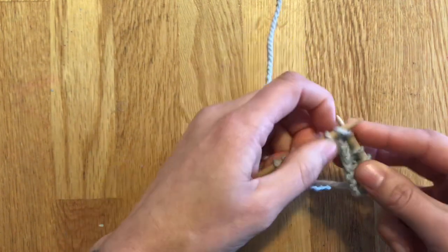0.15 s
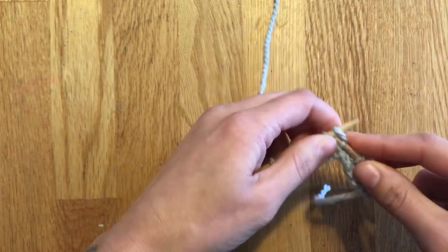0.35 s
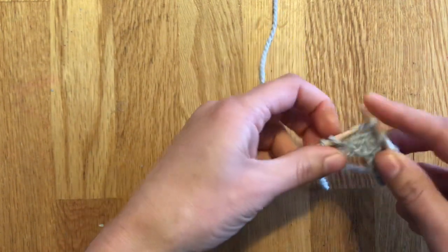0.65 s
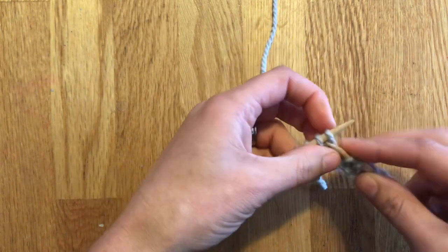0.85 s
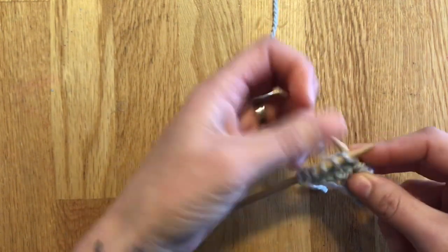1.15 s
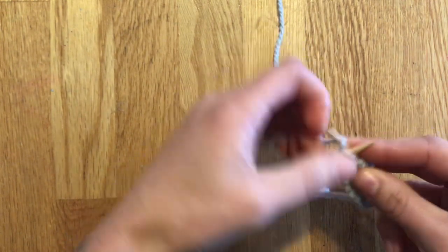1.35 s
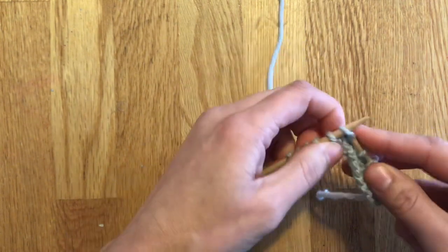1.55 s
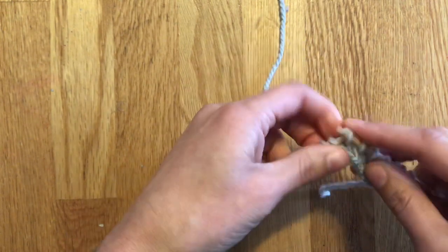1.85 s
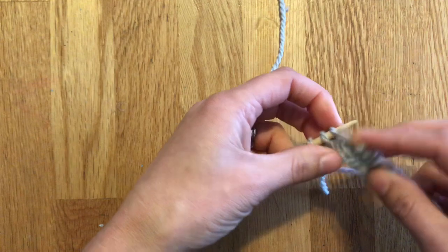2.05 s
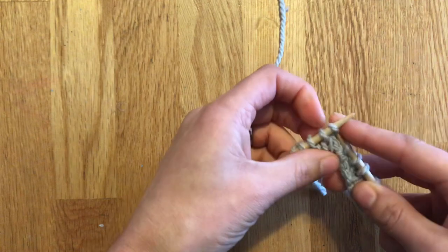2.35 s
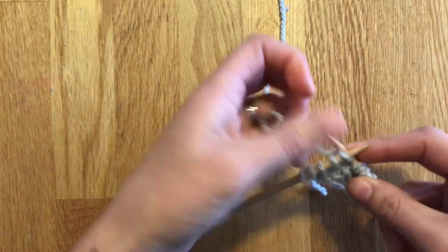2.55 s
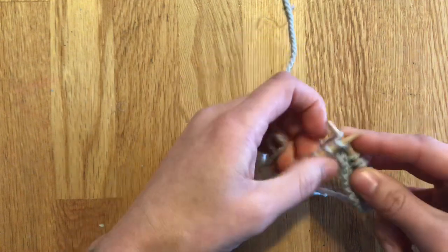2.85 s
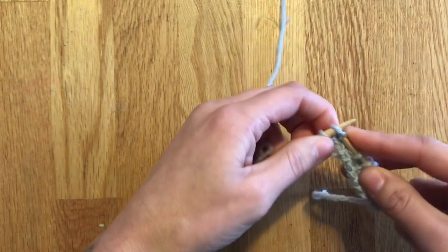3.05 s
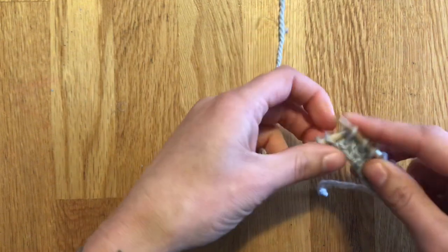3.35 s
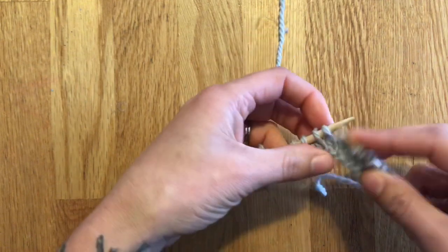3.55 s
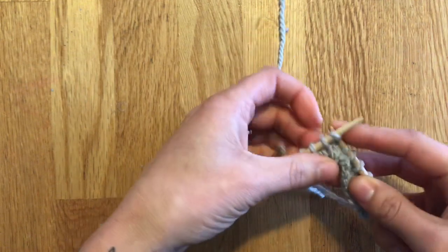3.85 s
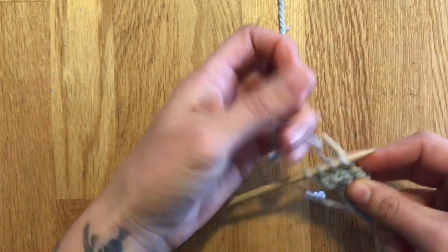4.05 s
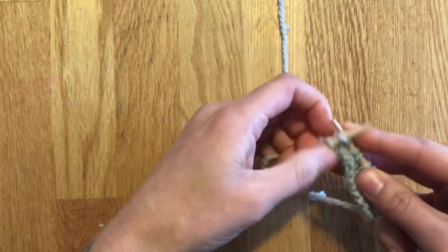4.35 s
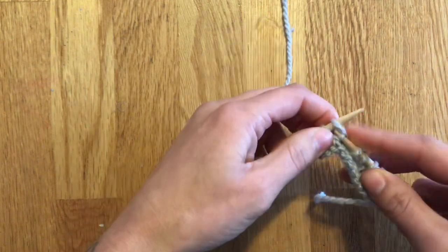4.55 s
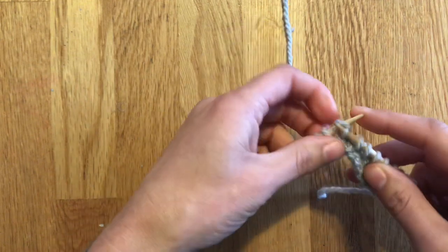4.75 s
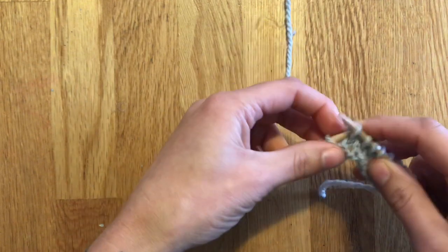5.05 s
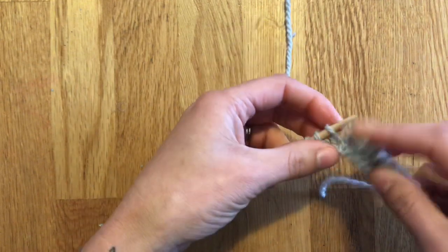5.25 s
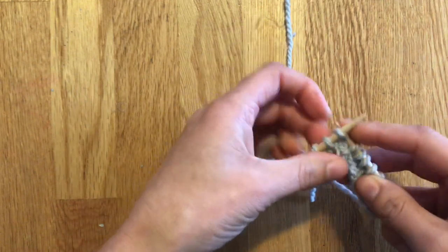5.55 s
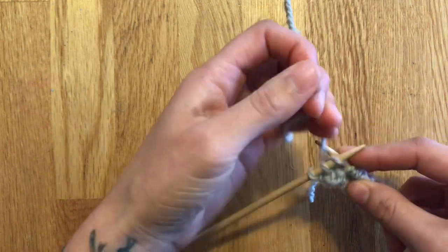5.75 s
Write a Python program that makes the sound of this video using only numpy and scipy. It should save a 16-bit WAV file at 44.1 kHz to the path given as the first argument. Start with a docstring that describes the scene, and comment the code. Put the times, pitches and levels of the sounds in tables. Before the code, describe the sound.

Soft, uneven ticks and tiny scrapes of wooden knitting needles working wool, with a low room drone behind them.

```python
"""Two wooden knitting needles work stitches just above a table, close to the microphone.
Their tips click together and set the shafts ringing; wood sticks and slips on wood in short scrapes.
Wool brushes over needles and fingers, and once a needle's free end knocks the table and skids.
Behind them the quiet room hums, with a low wavering drone as of far machinery."""
import sys
import numpy as np
from scipy import signal
from scipy.fft import rfft, irfft, next_fast_len
from scipy.io import wavfile
from scipy.ndimage import uniform_filter1d, map_coordinates

SR = 44100
rng = np.random.default_rng(int(sys.argv[2]) if len(sys.argv) > 2 else 0)


def unload_wav(signal):
    """Save mono or channel-first audio to the path in sys.argv[1] as 16-bit WAV at rate SR, clipped to [-1, 1]."""
    wavfile.write(
        sys.argv[1],
        SR,
        np.round(np.clip(np.atleast_2d(signal).T, -1, 1) * 32767).astype(np.int16),
    )


N = 260807

# Room tone, well behind the needles. Each row: time in seconds, level in dB.
HUM_LEVELS = [(0, -58), (3.4, -56), (5.91, -52)]
DRONE_LEVELS = [(0, -56.5), (.42, -51.5), (.6, -59.5), (1.35, -50.5), (2, -56.5), (3.25, -55.5), (3.6, -51),
                (3.7, -48.5), (4.4, -47), (4.63, -51.5), (4.95, -43.5), (5.15, -47), (5.91, -45.5)]  # the far machine
WHIRR_LEVELS = [(1.2, -75.5), (2.25, -52), (2.6, -64), (2.9, -58.5), (3.7, -81)]  # a second, passing drone
RUMBLE_LEVELS = [(0, -53), (.45, -53), (.65, -58), (.9, -54), (1.7, -55.5), (2.35, -51.5), (2.6, -59),
                 (2.88, -50.5), (3.4, -54), (5.91, -54.5)]
# Colours of the noises. Each row: frequency in Hz, relative spectral density in dB.
THROB_SPECTRUM = [(30, -60), (60, -24), (75, -12.5), (90, 0), (105, -6), (150, -6.5), (200, -22),
                  (500, -120)]  # the rumble that comes with the drone
RUMBLE_SPECTRUM = [(50, -20.5), (90, -3), (120, -5.5), (150, 4.5), (175, -1.5), (205, 2), (245, -5.5),
                   (300, -6.5), (360, -12.5), (450, -20.5), (570, -22), (800, -43.5)]
AIR_SPECTRUM = [(15, -43), (30, -11.5), (65, -4), (90, 1), (130, -9), (300, -22), (500, -26), (780, -28.5),
                (1100, -28), (1600, -34.5), (2200, -36), (4100, -41), (7000, -62), (14000, -51),
                (16000, -60)]
WOOL_SPECTRUM = [(400, 3), (900, 2), (1500, -3), (2500, -1.5), (4000, 0), (6200, 0), (8000, -4.5),
                 (11000, -2), (14000, -4), (16000, -8)]
RASP_SPECTRUM = [(500, -25.5), (1000, 3), (1800, 2), (2500, -0.5), (4000, 0), (6000, 0), (8200, -4.5),
                 (11000, 0.5), (16000, -2)]  # snagging fibres and slipping wood
CRACK_SPECTRUM = [(450, -7), (1100, -3.5), (2000, -7.5), (2600, 3), (4000, -10.5), (4900, -2), (6200, 1.5),
                  (7400, -5), (8500, 0), (9800, -13.5), (11000, 0), (12000, -9), (14000, -12), (16000, -7)]  # tip striking tip
SKID_SPECTRUM = [(1200, -30), (2050, -10), (2400, 2), (2800, -15), (3250, 0), (3700, -13), (5000, -36)]  # needle on table top
# A loop of wool is drawn along a needle.
# Each row: start in seconds, length in seconds, level in dB, top-octave gain in dB.
WOOL_PULLS = [(0.08, 0.08, -69, -4), (0.21, .05, -66.5, -5), (0.395, 0.087, -69, 6),
              (0.576, 0.16, -64, 0.5), (1, 0.23, -68, 0.5), (1.306, 0.026, -72, 6), (1.433, 0.18, -67, -4),
              (1.739, 0.03, -61.5, 1), (1.9, 0.035, -55.5, -2), (1.949, 0.088, -65.5, -4),
              (2.084, 0.11, -68, -2), (2.266, 0.033, -70, -2), (2.528, 0.068, -64, -2.5),
              (2.81, 0.053, -74.5, 16), (2.99, 0.067, -69.5, -7), (3.163, 0.055, -64.5, 3),
              (3.34, 0.078, -65.5, 1), (3.414, 0.1, -65.5, -5), (3.607, 0.045, -66.5, -3),
              (3.834, 0.094, -64.5, 1.5), (4.02, 0.058, -70.5, 5), (4.3, 0.087, -69, 0),
              (4.46, 0.037, -65, -1), (4.594, .14, -71.5, 2), (4.765, 0.094, -69.5, -3),
              (5.042, 0.075, -65.5, -2), (5.187, 0.051, -66, 0), (5.322, 0.048, -67.5, 1),
              (5.49, 0.24, -66.5, -3.5), (5.81, 0.044, -70, 5)]
# The tips meet, or the shafts catch as they scrape. Each row: time in seconds, middle-band level over 5 ms in
# dB, # bright edge relative to that in dB, resonance favoured by the contact point in Hz.
WOOD_CLICKS = [(0.2465, -57.5, -14, 5570), (0.4991, -45.5, -8.5, 6170), (0.6027, -43.5, -14, 6400),
               (0.8992, -59, -6, 5930), (0.989, -53.5, -9.5, 3780), (1.073, -65, -9, 3740),
               (1.4616, -64, -1, 5700), (1.5096, -45.5, -5.5, 5360), (1.5164, -55, -21, 6250),
               (1.5813, -62, -10, 5600), (1.8079, -50.5, -6.5, 7650), (2.1232, -54, -4, 6500),
               (2.192, -65, 0, 8650), (2.4824, -45.5, -8.5, 8700), (2.9125, -64.5, 4, 5700),
               (2.9425, -56.5, -6, 3970), (2.9785, -55.5, -18, 5400), (3.2129, -42, -2.5, 6040),
               (3.2196, -55.5, -13, 6060), (3.612, -58, -7, 5270), (3.6233, -57.5, -20, 3400),
               (3.787, -53, -3, 6300), (3.9994, -56.5, -2, 8100), (4.6895, -44, -3, 5750),
               (4.9434, -62.5, -31, 5840), (5.5232, -55.5, -14, 6300), (5.549, -64, -19, 2100),
               (5.5763, -56, -9, 3940), (5.621, -54.5, -6, 5800), (5.6587, -60, 5, 5600)]
# Body, middle and edge of a click. Each row: lower limit in Hz, upper limit in Hz.
CLICK_BANDS = [(700, 3200), (3200, 10000), (10000, 16000)]
# Wood rubs on wood. Each row: midpoint in seconds, length in seconds, level in dB,
# squeak relative to rasp in dB, top-octave gain in dB, favoured resonance in Hz.
NEEDLE_SCRAPES = [(0.657, 0.091, -73, -4, -13, 2450), (1.085, 0.031, -62, -8, -15, 3900),
                  (1.168, 0.035, -61.5, -7, -23, 2425), (2.38, 0.018, -58.5, -16, -4, 5800),
                  (2.979, 0.017, -53, -16, -18, 3900), (3.031, 0.028, -67, -4, 1.5, 3480),
                  (3.904, 0.025, -57.5, -3.5, -10, 3930), (3.994, 0.036, -58, -6, -3, 2410),
                  (4.382, 0.029, -63.5, 6.5, -6, 3680), (5.602, 0.027, -61.5, 7.5, -4, 5760),
                  (5.677, 0.04, -58.5, 0.5, 0, 8100)]
# Resonances of the wood. Each row: frequency in Hz, relative level in dB, seconds to fall by 60 dB.
STRUCK_NEEDLE_MODES = [(928, -16, 0.047), (1295, -4.5, 0.027), (2453, -7, 0.059), (2546, -9, .03),
                       (2856, -7.5, 0.031), (3340, -8, 0.033), (4037, -1, 0.015), (5320, -5.5, 0.0095),
                       (5620, -10, 0.011), (6090, -11.5, 0.021), (7010, -6, 0.016), (8180, -2.5, 0.012),
                       (9150, -9, 0.018), (10400, -14, .01), (12400, -8, .008), (13700, -1.5, 0.0086)]
RUBBED_NEEDLE_MODES = [(960, -14, 0.054), (2460, -0.5, 0.0071), (3510, -2, 0.016), (3900, -3, 0.012),
                       (5770, 0.5, 0.013), (8000, -7, 0.024), (10800, -6, 0.027), (12300, -3, 0.0069),
                       (14000, -16, .008)]
TABLE_MODES = [(200, 0, .035), (420, -16, .025), (690, -12, .02), (1650, -21, .012), (2200, -12, .012)]
# A needle's free end nudges the table: time in seconds, level in dB.
TABLE_KNOCK = (1.4733, -37)
# It then skids: midpoint in seconds, length in seconds, level in dB.
TABLE_SKID = (1.492, .021, -56.5)
# The room's reverberation. Each row: frequency in Hz, seconds to fall by 60 dB.
ROOM_DECAY = [(200, 0.16), (2000, 0.13), (6000, 0.24), (15000, 0.034)]
# Ripples in the microphone's response. Each row: centre in Hz, width in Hz, gain in dB.
MIC_RIPPLES = [(2900, 290, -0.5), (4910, 70, -7.5), (7730, 250, -1), (8140, 360, 0.5), (10570, 540, -3),
               (11050, 350, 1), (11500, 490, -1.5), (14600, 210, 1)]


def amp(db):
    """Decibels to gain."""
    return 10 ** (np.asarray(db) / 20)


def unit(x):
    """x scaled to rms 1."""
    return x / np.sqrt(np.mean(x ** 2) + 1e-20)


def along(points, hz):
    """(Hz, value) points read on a log frequency axis."""
    point_hz, values = np.transpose(points)
    return np.interp(np.log(hz + 1), np.log(point_hz + 1), values)


def curve(points):
    """(seconds, value) points joined into one value per sample."""
    return np.interp(np.arange(N) / SR, *np.transpose(points))


def wobble(knots_per_s):
    """A smooth random curve around zero."""
    knots = rng.standard_normal(int(N * knots_per_s / SR) + 4)
    return map_coordinates(knots, [np.arange(N) * knots_per_s / SR])


def tone(hz):
    """A sine of rms 1 that follows a pitch curve."""
    return np.sqrt(2) * np.sin(2 * np.pi * (np.cumsum(hz) / SR + rng.random()))


def filtered(x, response):
    """x through a response given as a function of Hz."""
    size = next_fast_len(len(x) + SR // 4)
    return irfft(rfft(x, size) * response(np.fft.rfftfreq(size, 1 / SR)), size)[:len(x)]


def coloured(x, spectrum, size=2048):
    """x through a minimum-phase filter with the given (Hz, dB) shape."""
    cepstrum = irfft(np.log(amp(along(spectrum, np.fft.rfftfreq(size, 1 / SR)))))
    causal_fold = np.r_[1, np.full(size // 2 - 1, 2), 1, np.zeros(size // 2 - 1)]
    impulse_response = irfft(np.exp(rfft(cepstrum * causal_fold)))
    return signal.fftconvolve(x, impulse_response)[:len(x)]


def noise(spectrum):
    """Noise of rms 1 with the given colour."""
    return unit(filtered(rng.standard_normal(N), lambda hz: amp(along(spectrum, hz))))


def patchy(x, depth_db, size=512, patch_bins=7):
    """x with drifting patches of gain over time and frequency, at rms 1."""
    spectra = signal.stft(x, nperseg=size)[2]
    patches = uniform_filter1d(rng.standard_normal(spectra.shape), patch_bins, axis=0)
    patches = unit(uniform_filter1d(patches, 2 * patch_bins, axis=1))
    return unit(signal.istft(spectra * amp(depth_db * patches), nperseg=size)[1][:len(x)])


def brightened(x, db, corner_hz=9000):
    """x with its top octave raised or lowered by db."""
    top = filtered(x, lambda hz: 1 - 1 / (1 + (hz / corner_hz) ** 6))
    return x + (amp(db) - 1) * top


def add(track, start_s, sound):
    """Mix a sound into the track."""
    part = track[round(start_s * SR):][:len(sound)]
    part += sound[:len(part)]


def far_machine(start_hz=120.7, sag_hz_per_s=1.45, settled_hz=115.4, throb_db=-9):
    """A distant machine drones and throbs; it slows steadily, then holds its speed."""
    hz = np.maximum(start_hz - sag_hz_per_s * np.arange(N) / SR, settled_hz)
    gain = amp(curve(DRONE_LEVELS) + wobble(12))
    return gain * (tone(hz + 1.03 * wobble(12)) + amp(throb_db) * noise(THROB_SPECTRUM))


def room_tone(hum_hz=52, whirr_hz=138.1, octave_db=-9, air_db=-57):
    """All around: a steady low hum, a passing whirr, low rumble and faint hiss."""
    whirr_pitch = whirr_hz + 0.5 * wobble(3)
    hum = amp(curve(HUM_LEVELS) + 1.2 * wobble(3.7)) * tone(hum_hz + 0.5 * wobble(5.06))
    whirr_gain = amp(curve(WHIRR_LEVELS) + 3.7 * wobble(7.9))
    whirr = whirr_gain * (tone(whirr_pitch) + amp(octave_db) * tone(2 * whirr_pitch))
    rumble = patchy(noise(RUMBLE_SPECTRUM), depth_db=2.5, size=2048, patch_bins=3)
    return hum + whirr + amp(curve(RUMBLE_LEVELS)) * rumble + amp(air_db) * noise(AIR_SPECTRUM)


def off_table(x, delay_s=0.000416, share=0.051):
    """The table top just below sends back an inverted copy, which combs the spectrum."""
    return filtered(x, lambda hz: 1 - share * np.exp(-2j * np.pi * hz * delay_s))


def catches(size, per_s, spread_db):
    """Rubbing surfaces catch and let go: random impulses of uneven strength."""
    caught = rng.random(size) < per_s / SR
    return caught * amp(spread_db * np.clip(rng.standard_normal(size), -2, 2))


def pulling(handling_db=-73.5, drift_db=1.5, ramp_s=0.025):
    """Level and brightness of the wool in dB: each pull rises, holds and eases off over the handling."""
    t = np.arange(N) / SR
    power = amp(handling_db + drift_db * wobble(16)) ** 2
    weighted_brightness = np.zeros(N)
    for start_s, length_s, db, bright_db in WOOL_PULLS:
        rise = (1 + np.tanh(2 * (t - start_s) / ramp_s)) / 2
        fall = (1 - np.tanh(2 * (t - start_s - length_s) / ramp_s)) / 2
        pull_power = amp(db) ** 2 * rise * fall
        power += pull_power
        weighted_brightness += pull_power * bright_db
    return 10 * np.log10(power), weighted_brightness / power


def wool(flutter_db=1.5, snag_db=-7):
    """Close up, fibres brush over wood and skin, swelling with each pull; single fibres snag."""
    pull_db, bright_db = pulling()
    brush = patchy(off_table(noise(WOOL_SPECTRUM)), depth_db=2.5)
    snags = unit(coloured(catches(N, per_s=160, spread_db=4), RASP_SPECTRUM))
    fibres = unit(brush + amp(snag_db) * snags)
    return amp(pull_db + flutter_db * wobble(60)) * brightened(fibres, bright_db)


def ring(modes, scatter_db, size=4096):
    """Wood rings in damped modes, each struck at a slightly new strength."""
    t = np.arange(size) / SR
    hz, db, t60 = np.transpose(modes)[:, :, None]
    strength_db = db + scatter_db * rng.standard_normal(db.shape)
    partials = np.sin(2 * np.pi * (hz * t + rng.random(hz.shape)))
    return np.sum(amp(strength_db - 60 * t / t60) * partials, axis=0)


def favouring(x, centre_hz, gain_db, width_hz):
    """The point of contact favours one resonance of the shaft."""
    resonance = lambda hz: 1j * hz * width_hz / (centre_hz ** 2 - hz ** 2 + 1j * hz * width_hz)
    return filtered(x, lambda hz: 1 + (amp(gain_db) - 1) * resonance(hz))


def click(levels_db, favoured_hz, contact_s=0.0018, chatter=0.038, ring_db=-4, travel_s=0.000514):
    """The tips strike and chatter for about two milliseconds; the shafts ring on briefly."""
    shaft = unit(ring(STRUCK_NEEDLE_MODES, scatter_db=1.5))
    t = np.arange(len(shaft)) / SR
    contact = np.exp(-(t / contact_s) ** 4)
    force = signal.unit_impulse(len(t)) + chatter * rng.standard_normal(len(t)) * contact
    crack = unit(off_table(coloured(force, CRACK_SPECTRUM), share=0.15))
    ringing = amp(ring_db) * shaft * (1 - np.exp(-t / 0.00011))
    sound = favouring(crack + ringing, favoured_hz, gain_db=9, width_hz=260)
    # bending waves travel faster at high pitch, which spreads the blow
    sound = filtered(sound, lambda hz: np.exp(-4j * np.pi * travel_s * np.sqrt(hz * favoured_hz)))
    # how hard the needles meet sets the weight of body, middle and edge
    gains_db = []
    for db, band in zip(levels_db, CLICK_BANDS):
        bandpass = signal.butter(3, band, 'bandpass', fs=SR, output='sos')
        onset = signal.sosfilt(bandpass, sound)[:240]  # about 5 ms
        gains_db.append(db - 20 * np.log10(np.std(onset)))
    body, middle, edge = gains_db
    return coloured(sound, [(2800, body), (3800, middle), (9000, middle), (10800, edge)])


def needle_clicks(lead_s=0.0002):
    """Every click of the needles, whether the tips meet or the shafts catch as they scrape, started a moment
    early as the blow has to travel along the shaft."""
    track = np.zeros(N)
    for time_s, db, edge_db, favoured_hz in WOOD_CLICKS:
        body_db = -11 - 0.25 * edge_db  # a duller contact has more woody body
        add(track, time_s - lead_s, click([db + body_db, db, db + edge_db], favoured_hz))
    return track


def needle_scrapes():
    """Wood sticks and slips on wood: tiny uneven catches rasp and keep the shafts ringing."""
    track = np.zeros(N)
    t = np.arange(SR // 4) / SR - 1 / 8  # centred on the scrape
    for middle_s, length_s, db, squeak_db, bright_db, favoured_hz in NEEDLE_SCRAPES:
        slips = catches(len(t), per_s=2200, spread_db=3)
        swell = np.exp(-(2 * t / length_s) ** 2)
        force = slips * rng.choice([-1, 1], len(t)) * swell
        rasp = unit(off_table(coloured(force, RASP_SPECTRUM)))
        squeak = unit(signal.fftconvolve(force, ring(RUBBED_NEEDLE_MODES, scatter_db=3))[:len(t)])
        sound = favouring(rasp + amp(squeak_db) * squeak, favoured_hz, gain_db=6.5, width_hz=200)
        gain = amp(db) * np.sqrt(np.mean(swell ** 2))
        add(track, middle_s + t[0], gain * brightened(sound, bright_db))
    return track


def table_bump(attack_s=0.00045):
    """A needle's free end knocks softly on the table top, then skids on it."""
    knock_s, knock_db = TABLE_KNOCK
    knock = ring(TABLE_MODES, scatter_db=0.5)
    attack = 1 - np.exp(-np.arange(len(knock)) / SR / attack_s)
    track = np.zeros(N)
    add(track, knock_s, amp(knock_db) * knock * attack)
    middle_s, length_s, skid_db = TABLE_SKID
    swell = np.exp(-(2 * (np.arange(N) / SR - middle_s) / length_s) ** 2)
    return track + amp(skid_db) * swell * noise(SKID_SPECTRUM)


def room_reverb(x):
    """The walls answer with a short tail; the highest treble dies first."""
    hz, t, spectra = signal.stft(rng.standard_normal(SR // 2), SR, nperseg=256)
    decay = amp(-60 * t / along(ROOM_DECAY, hz)[:, None])
    tail = signal.istft(spectra * decay, SR, nperseg=256)[1]
    tail = coloured(tail, [(600, 5.5), (1300, 17), (2500, 5.5), (4000, -4.5), (6000, -5), (12000, 5.5)])
    return signal.fftconvolve(x, tail / np.linalg.norm(tail))[:N]


def scene(reverb_db=-13):
    """Knitting close to one microphone, with the quiet room behind it."""
    needles = needle_clicks() + needle_scrapes() + table_bump()
    handwork = needles + amp(reverb_db) * room_reverb(needles) + wool()
    return (handwork + far_machine() + room_tone())[None]


def record(dry, top_hz=16000):
    """The microphone ripples the treble and passes nothing above its band limit."""
    def response(hz):
        ripple_db = sum(db * np.exp(-((hz - centre) / width) ** 2) for centre, width, db in MIC_RIPPLES)
        return amp(ripple_db) * (hz < top_hz)
    return np.array([filtered(channel, response) for channel in dry])


dry = scene()
out = record(dry)
unload_wav(out)
```